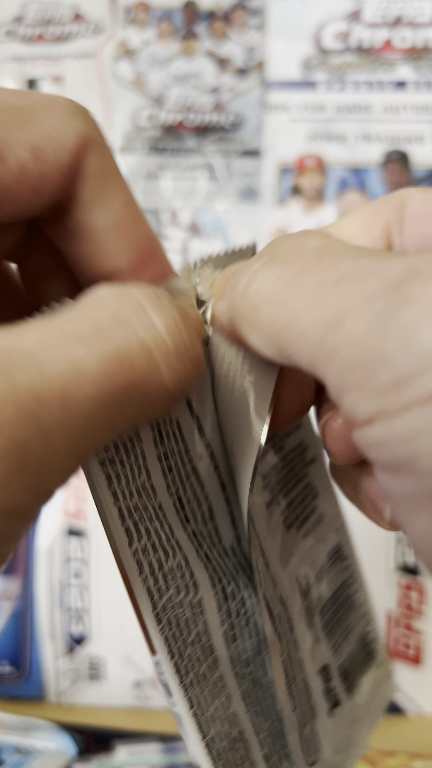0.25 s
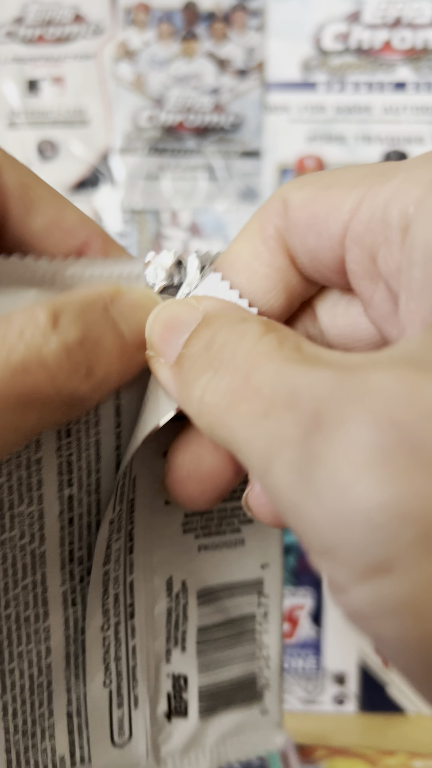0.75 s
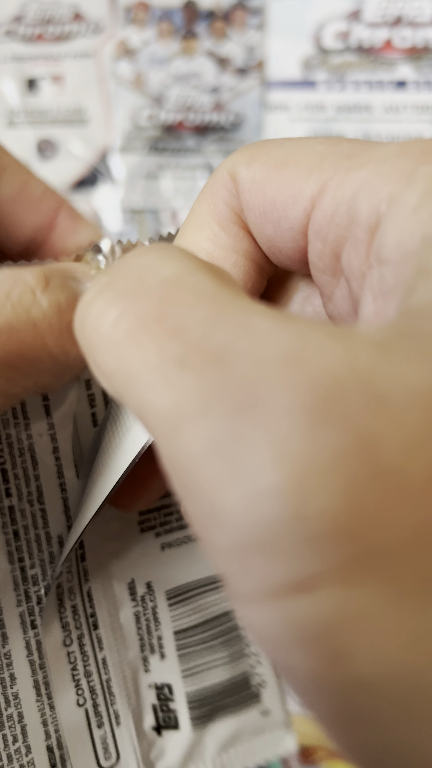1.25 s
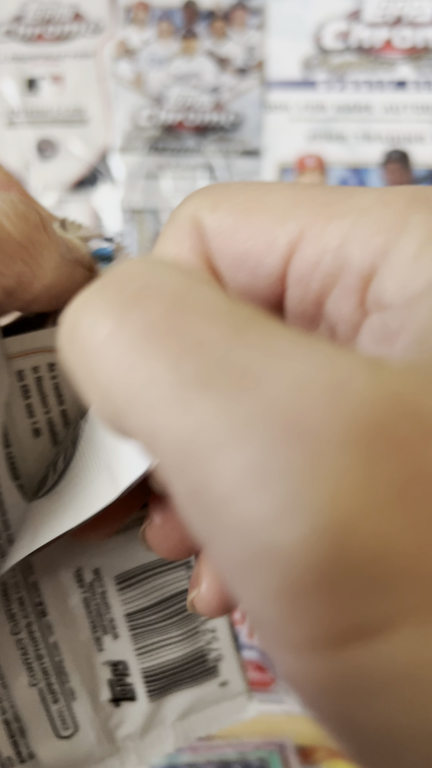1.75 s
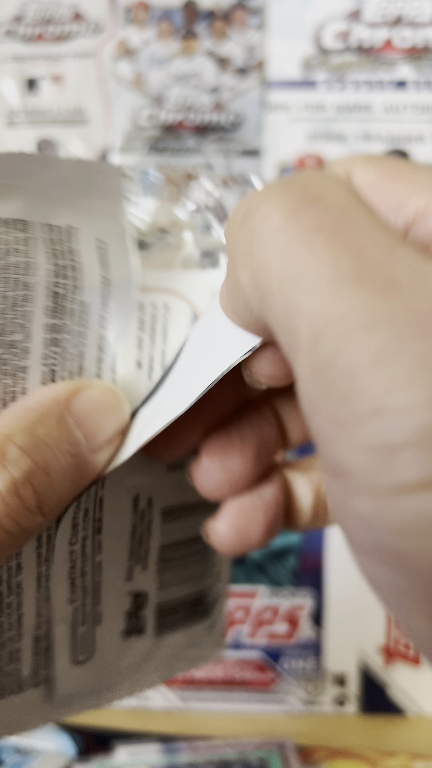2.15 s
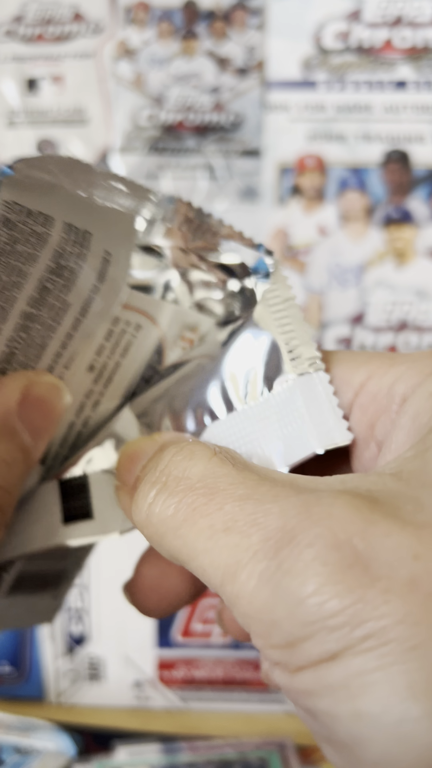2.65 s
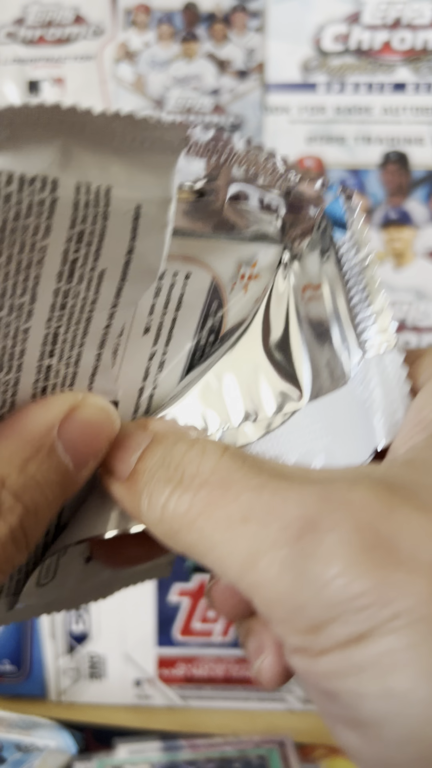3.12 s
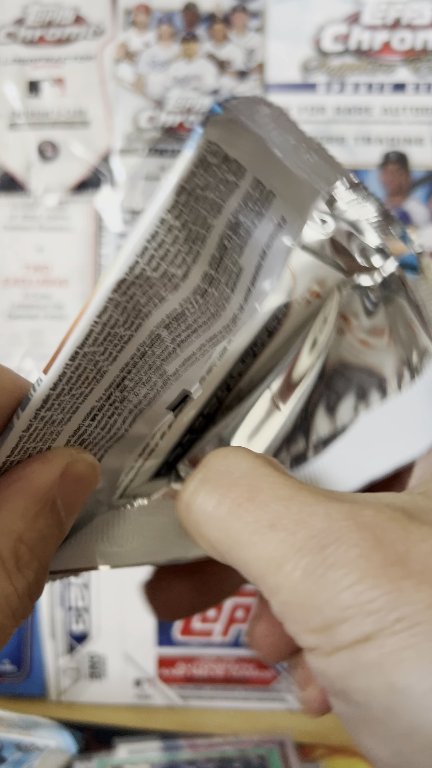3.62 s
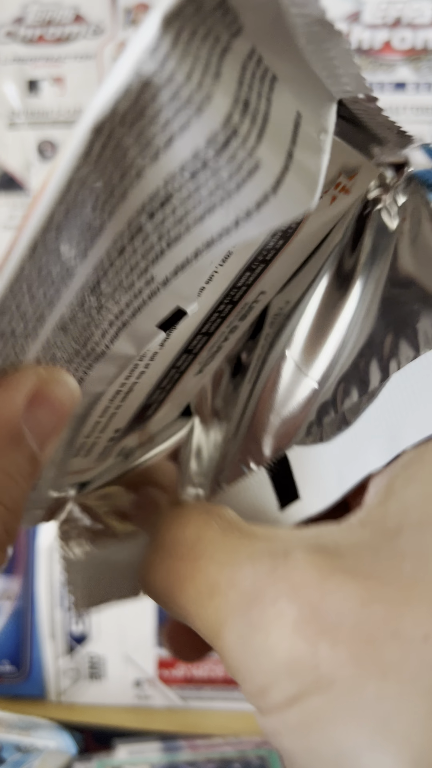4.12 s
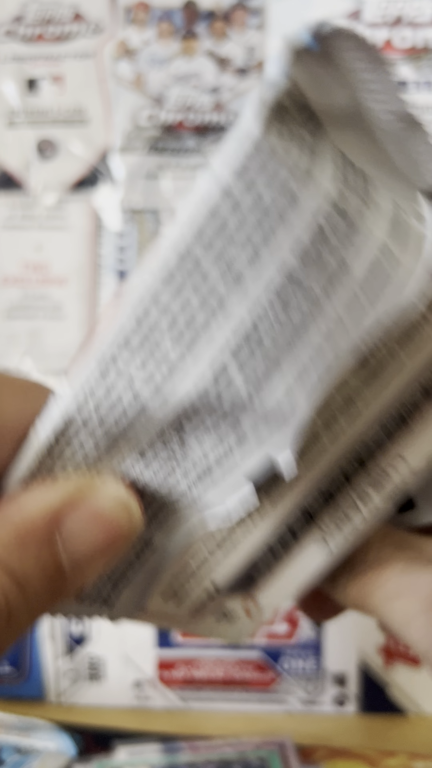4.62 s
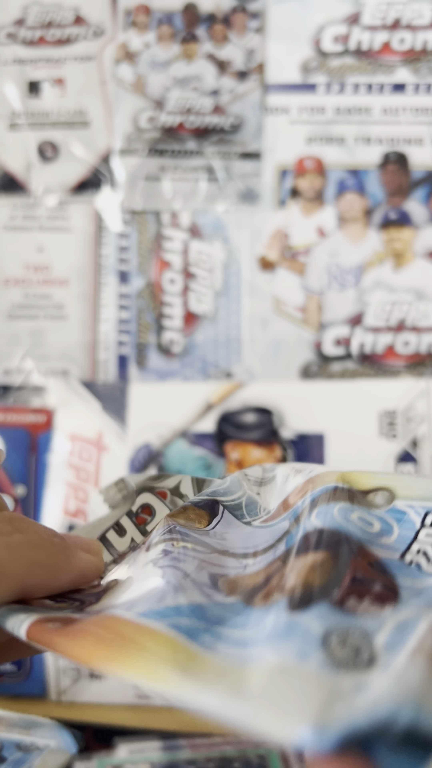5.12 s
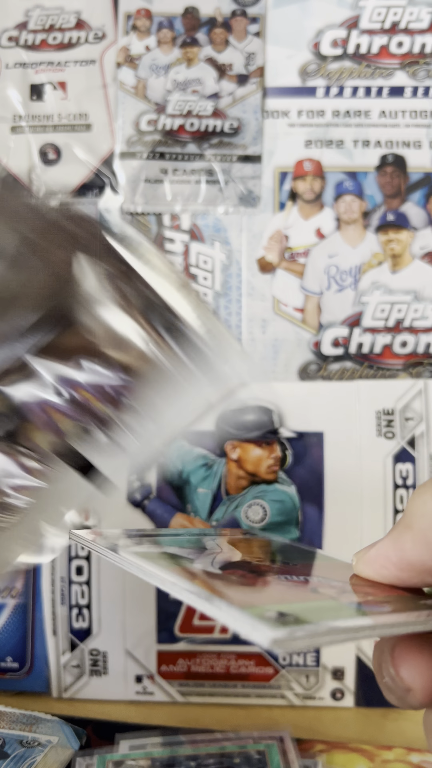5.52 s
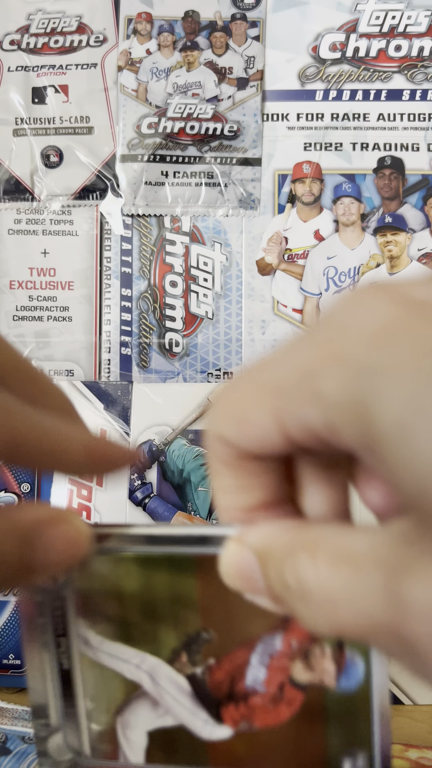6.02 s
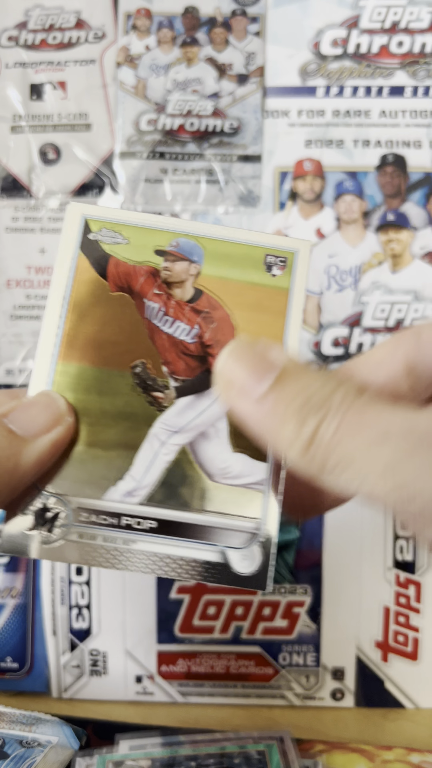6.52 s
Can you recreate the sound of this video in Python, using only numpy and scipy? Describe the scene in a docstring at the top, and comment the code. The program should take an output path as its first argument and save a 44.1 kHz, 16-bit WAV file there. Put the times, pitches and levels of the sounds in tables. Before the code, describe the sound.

Crisp wrapper crackles and bright film snaps grow fuller as a small pack opens, ending in faint card scuffs in a quiet room.

```python
"""Opening a pack of trading cards

Hands peel open a foil-plastic pack close to two microphone ports in a small room. Film creases are filtered
noise bursts, single or in crackling runs; sliding is shaped noise; bumps are sagging tones in dull noise.
The wider the pack opens, the fuller it sounds; then the bare cards slide and scuff quietly.
Short echoes, a small diffuse room, low ventilation noise and a faint fan whine surround it."""
import sys
import numpy as np
from scipy import signal
from scipy.fft import rfft, irfft, next_fast_len
from scipy.io import wavfile

SR = 44100
rng = np.random.default_rng(int(sys.argv[2]) if len(sys.argv) > 2 else 0)


def log_audio(samples):
    """Write samples as a 16-bit WAV file to the path given in sys.argv[1]."""
    # one column per channel
    frames = np.atleast_2d(samples).T
    # limit to full scale, then quantise
    limited = np.clip(frames, -1, 1)
    pcm = np.round(limited * 32767).astype(np.int16)
    wavfile.write(sys.argv[1], SR, pcm)


N = 298557
TIME = np.arange(N) / SR

CARDS_OUT_S = 5.0
# resonances: taut film, bare card, air in the opened pack
POUCH_HZ, CARD_HZ, HOLLOW_HZ = 1830, 2380, 622


def from_db(db):
    """Amplitude gain of a level in dB."""
    return 10 ** (np.asarray(db) / 20)


def rms_one(x):
    """Scale to rms 1."""
    return x / np.sqrt(np.mean(x ** 2) + 1e-20)


def unit_burst(x):
    """Scale to the energy of one millisecond at rms 1."""
    return x / np.sqrt(np.sum(x ** 2) * 1000 / SR + 1e-20)


def at_hz(points, hz):
    """Interpolate (hz, value) points over log frequency."""
    points_hz, values = np.transpose(points)
    return np.interp(np.log(hz + 1), np.log(points_hz), values)


def band(x, low_hz, high_hz, order=2):
    """Butterworth band-pass."""
    sos = signal.butter(order, [low_hz, min(high_hz, .45 * SR)], "band", fs=SR, output="sos")
    return signal.sosfilt(sos, x + 1e-18)


def resonance(x, hz, width_hz):
    """Two-pole resonator, gain 1 on top."""
    r = np.exp(-np.pi * width_hz / SR)
    zeros = np.array([1, 0, -1]) * (1 - r * r) / 2
    poles = [1, -2 * r * np.cos(2 * np.pi * hz / SR), r * r]
    return signal.lfilter(zeros, poles, x + 1e-18)


def drift(rate_hz):
    """Random curve, rms 1, with rate_hz straight segments a second."""
    position = TIME * rate_hz
    count = int(position[-1]) + 2
    return rms_one(np.interp(position, np.arange(count), rng.standard_normal(count)))


def coloured(spectrum):
    """Noise of a given spectrum, rms 1."""
    size = next_fast_len(N)
    gain = from_db(at_hz(spectrum, np.fft.rfftfreq(size, 1 / SR)))
    return rms_one(irfft(rfft(rng.standard_normal(size)) * gain, size)[:N])


def add(out, s, sound):
    """Mix a short sound in at time s."""
    start = max(round(s * SR), 0)
    out[..., start:start + sound.shape[-1]] += sound[..., :N - start]


def spread(mid, side, side_db):
    """Left and right from a shared and an opposed part."""
    return mid + from_db(side_db) * side * np.array([[1], [-1]])


# mouth of the pack: time_s, open_share (0-1)
PACK_OPENING = [(1.75, 0.19), (2.65, 1)]


def openness(s):
    """How far the pack is open at time s, 0-1."""
    return np.clip(np.interp(s, *np.transpose(PACK_OPENING)), 0, 1)


def stutter(snap, gap, sign, longest_s=.0016, second_db=-5):
    """A crease gives in two steps; the gap between them gives each snap its own hollow colour."""
    lag = round(longest_s * gap * SR)
    share = from_db(second_db) * sign
    second = np.pad(snap, ((0, 0), (lag, 0)))[:, :snap.shape[1]]
    return (snap + share * second) / np.sqrt(1 + share ** 2)


def heave(noise, opening, sheet_s=0.0032, hollow_db=-7.0):
    """The whole sheet heaves and pumps the air inside; lower and more hollow as the pack opens."""
    push = noise * np.exp(-np.arange(len(noise)) / SR / sheet_s)
    hollow = from_db(hollow_db) * opening * unit_burst(resonance(push, HOLLOW_HZ, 210))
    sheet = unit_burst(band(push, 720 - 400 * opening, 1250))
    return unit_burst(sheet + hollow)


# big creases snapping through: start_s, crack_db, film_db (film around it re crack)
BIG_SNAPS = [(0.0863, -11.5, -20), (0.1664, -8.5, -33), (0.2005, -11.5, -13), (0.2604, -15, -24),
             (0.2701, -9.5, -17), (0.2773, -14, -30), (0.3162, -13, -20), (0.3265, -6.5, -22),
             (0.3905, -18.5, -39), (0.4473, -32, -13.5), (0.477, -24, -5), (0.5436, -11, -6),
             (0.6052, -22, -15.5), (0.7031, -11, -10), (0.734, -15, -17), (0.753, -13.5, -10.5),
             (0.8954, -26.5, -21), (0.9222, -28.5, -22), (0.9447, -13, -22), (0.996, -14, -15.5),
             (1.0176, -12.5, -12.5), (1.0397, -11.5, -5), (1.065, -9, -5.5), (1.077, -15, -13),
             (1.0894, -12.5, -0.5), (1.1417, -16.5, -16), (1.1557, -21, -6), (1.2053, -23.5, 0),
             (1.2455, -31.5, 3), (1.2698, -11.5, -12.5), (1.3874, -21, -10.5), (1.4066, -17.5, -4.5),
             (1.4952, -16, -14), (1.5023, -16, -16), (1.5356, -9.5, -21), (1.5598, -13.5, -22),
             (1.5865, -7.5, -6.5), (1.6422, -8.5, -3), (1.6542, -10.5, -8.5), (1.7224, -27, -7.5),
             (1.7514, -28.5, 2), (1.8254, -22, -7.5), (1.869, -19.5, -18), (1.9652, -21.5, -2.5),
             (2.1283, -26, -8), (2.1646, -28, -13), (2.2085, -3, -12), (2.3033, -25.5, -3),
             (2.3825, -30, -11), (2.5259, -25.5, -7), (2.57, -17, -12), (2.6181, -15.5, -8),
             (2.697, -10, -8.5), (2.7112, -8, -2), (2.7372, -15, -13), (2.8092, -28.5, 5),
             (2.8499, -5.5, -19), (2.8974, -22, 2), (2.954, -11.5, -9), (2.9941, -20.5, -5),
             (3.1117, -36, 6), (3.2502, -19.5, -28), (3.2831, -20, -15), (3.3228, -32, -1),
             (3.3517, -8, -14.5), (3.3931, -6.5, -12.5), (3.4062, -13, -4), (3.4312, -11, -20),
             (3.4802, -12, -2), (3.4989, -17, -6), (3.5782, -8.5, -12), (3.5839, -11.5, -19.5),
             (3.6282, -19, -9), (3.634, -9, -31), (3.6753, -21, -15), (3.6956, -16.5, -9),
             (3.8243, -17, -13.5), (3.9139, -12, -23), (3.9396, -14, -2), (3.9713, -26, 5.5),
             (4.026, -10, -7), (4.034, -7.5, -19), (4.0577, -5.5, -6), (4.0687, -11, 0.5),
             (4.1216, -7, -4.5), (4.1344, -13, -0.5), (4.1945, -16, 0), (4.22, -9, -30),
             (4.2417, -10, -4.5), (4.275, -15.5, 2.5), (4.332, -7.5, -5), (4.4617, -8, -20),
             (4.481, -11, -4.5), (4.5812, -10, -12), (4.6375, -7.5, -28), (4.647, -17.5, -0.5),
             (4.6872, -17, -4), (4.9496, -24, -9.5), (4.9565, -11, -17.5), (4.9716, -30, -12),
             (5.126, -30, -12), (5.386, -6.5, -16.5), (5.393, -14, -6), (5.411, -22, -7), (5.445, -15, -14),
             (5.544, -15.5, -16), (5.5782, -12.5, -7.5), (5.6513, -27.5, -5), (5.7124, -24, -5.5)]
# nominal crack pitch, its shift per dB of film, random spread
CRACK_HZ, CRACK_OCTAVES_PER_DB, CRACK_SCATTER_OCTAVES = 7500, -.008, .2
# whole sheet re film around the crease: when sealed, and gained when open
SHEET_DB, SHEET_OPEN_DB = -18.5, 13


def snaps(rows, crack_s=0.00047, rise_s=0.00016, facet_s=0.0015, flutter_s=0.0039, flutter_db=-23,
          width_hz=2800, splinter_db=-12, splinter_s=0.00023, pouch_width_hz=340, side_db=-13,
          facet_side_db=-12):
    """A crease flips in about a millisecond and shakes the film; more film shaken, lower crack."""
    out, t = np.zeros((2, N)), np.arange(1536) / SR
    onset = 1 - np.exp(-t / rise_s)
    flutter = from_db(flutter_db) * np.exp(-t / flutter_s)   # bending waves run on through the film
    for s, crack_db, film_db in rows:
        noise = rng.standard_normal((6, len(t)))
        facet_size = rng.uniform(-0.76, 1)
        length = 2 ** rng.uniform(-1.1, 0.73)
        scatter = CRACK_SCATTER_OCTAVES * rng.uniform(-1, 1)
        gap, sign = rng.uniform(.15, 1), rng.choice([-1, 1])
        if crack_db < -50 or s > TIME[-1]:
            continue
        opening = openness(s)
        crack_hz = CRACK_HZ * 2 ** (CRACK_OCTAVES_PER_DB * film_db + scatter)

        kick = noise[:2] * (np.exp(-t / (crack_s * length)) + flutter) * onset
        top, side = (unit_burst(band(resonance(k, crack_hz, width_hz), 2200, 20000)) for k in kick)
        splinter = unit_burst(band(noise[2] * onset * np.exp(-t / splinter_s), 16000, 17000))
        top = spread(unit_burst(top + from_db(splinter_db) * splinter), side, side_db)

        # pouch and bare cards ring at one pitch; in the open pack each facet has more of its own
        flex, flex_side = noise[3:5] * (np.exp(-t / (facet_s * length)) + flutter) * onset
        ring_hz = POUCH_HZ if s < CARDS_OUT_S else CARD_HZ
        ring = unit_burst(resonance(flex, ring_hz, pouch_width_hz)) * (1 - 0.32 * opening)
        facet = unit_burst(resonance(flex, 2700 * 2 ** (facet_size / 2), 300)) * (0.35 + 0.37 * opening)
        middle = unit_burst(ring + facet + 0.5 * unit_burst(band(flex, 1400, 6100)))
        middle = spread(middle, unit_burst(band(flex_side, 2400, 4500)), facet_side_db)

        sheet = from_db(film_db + SHEET_DB + SHEET_OPEN_DB * opening) * heave(noise[5], opening)
        crease = stutter(top + from_db(film_db) * middle, gap, sign)
        add(out, s, from_db(crack_db) * (crease + sheet))
    return out


# fingers crumple the film: start_s, end_s, effort_db, film_db (film around each crease re crack)
FILM_CRUMPLES = [(0.097, 0.12, -45, -21), (0.164, 0.223, -50, -22), (0.271, 0.325, -32.5, -17.5),
                 (0.693, 0.772, -46, -7.5), (1.045, 1.095, -34.5, -6), (1.136, 1.245, -48, -1.5),
                 (1.51, 1.656, -36, -11.5), (1.817, 1.91, -50, -5), (2.692, 2.731, -37, -4),
                 (2.868, 2.957, -43, -5), (3.0, 3.06, -52, -1), (3.197, 3.275, -50.5, -9.5),
                 (3.385, 3.493, -33.5, -7.5), (3.615, 3.71, -43, -6.5), (3.901, 3.952, -37, -7.5),
                 (4.055, 4.195, -29, -3.5), (4.234, 4.287, -44, -3.5), (4.541, 4.619, -45, -4),
                 (4.645, 4.735, -40, -5.5), (4.765, 4.794, -48.5, -1.5), (5.445, 5.475, -40, -4)]
# snaps in a crumple: mean rate, crack re effort, spreads of crack and film
RUN_PER_S, RUN_DB, RUN_SCATTER_DB, RUN_FILM_SCATTER_DB = 95, 17.5, 3.5, 3.5
RUN_FADE_DB_PER_S = 700.5   # once the fingers stop


def runs(count=22):
    """In a crumple one crease sets off the next at uneven gaps; returns rows for snaps()."""
    rows = []
    for start_s, end_s, effort_db, film_db in FILM_CRUMPLES:
        gaps = rng.gamma(3, 1 / 3, count)
        strength, film = np.clip(rng.standard_normal((2, count)), -2, 1.5)
        times = start_s + (np.cumsum(gaps) - gaps[0] / 2) / RUN_PER_S
        fade_db = RUN_FADE_DB_PER_S * np.maximum(times - end_s, 0)
        crack_db = effort_db + RUN_DB + RUN_SCATTER_DB * strength - fade_db
        rows += zip(times, crack_db, film_db + RUN_FILM_SCATTER_DB * film)
    return rows


# stray ticks: mean rate, crack, film re crack, spread of both
STRAY_PER_S, STRAY_DB, STRAY_FILM_DB, STRAY_SCATTER_DB = 20, -35.5, -6, 4


def strays(count=150):
    """Small creases of the strained film let go at random until the cards are out; rows for snaps()."""
    times = np.cumsum(rng.exponential(1, count)) / STRAY_PER_S
    strength_db, film_db = STRAY_SCATTER_DB * np.clip(rng.standard_normal((2, count)), -2, 2)
    fade_db = RUN_FADE_DB_PER_S * np.maximum(times - CARDS_OUT_S, 0)
    return list(zip(times, STRAY_DB + strength_db - fade_db, STRAY_FILM_DB + film_db))


# whole wall of the pack flips over: start_s, level_db (re unit burst)
WALL_POPS = [(1.136, -28), (1.2182, -23), (2.2086, -20), (2.697, -15), (2.712, -7), (2.735, -21),
             (2.897, -22), (3.284, -16.5), (3.9318, -14), (4.0577, -13.5), (4.1755, -15), (4.275, -16),
             (4.481, -19)]


def pops():
    """A wall of the pack flips with a knock, more hollow as the pack opens."""
    out = np.zeros(N)
    for (s, db), noise in zip(WALL_POPS, rng.standard_normal((len(WALL_POPS), SR // 20))):
        add(out, s, from_db(db) * heave(noise, openness(s)))
    return out


def crackle(level_db, per_s=115, size_db=4.0, burst_s=0.00056, pitch_hz=7600, width_hz=2600,
            facet_db=-10, gain_db=-7.5, count=2000):
    """Small wrinkles give way at random, more often under strain; pitch and share of body vary."""
    out, t = np.zeros((2, N)), np.arange(256) / SR
    rate = np.minimum(per_s * from_db(.5 * (level_db + 40)), 2000)   # per_s holds at -40 dB
    noises = rng.standard_normal((count, 3, len(t)))
    traits = np.clip(rng.standard_normal((count, 4)), -2, 2)
    for at in np.flatnonzero(rng.random(N) < rate / SR):
        noise, (size, pitch, body, facet) = noises[at % count], traits[at % count]
        tick_hz = pitch_hz * 2 ** (.27 * pitch)
        kick = noise[:2] * np.exp(-t / burst_s)
        tick, side = (unit_burst(resonance(k, tick_hz, width_hz)) for k in kick)
        flex = noise[2] * np.exp(-t / burst_s / 2)
        flex = unit_burst(resonance(flex, POUCH_HZ * 2 ** (facet / 2), 500))
        wrinkle = spread(tick, side, side_db=-17) + from_db(facet_db + 4.2 * body) * flex
        gain = from_db(level_db[at] + gain_db + size_db * size)
        add(out, at / SR, wrinkle * gain / np.sqrt(rate[at] / 1000))   # denser ticks are each weaker
    return out


ATTACK_DB_PER_S, SWELL_DB, RELEASE_DB_PER_S = 519, 3.5, 293.5


def move(start_s, end_s):
    """Gain of one move of the hands: it sets in, swells while it lasts and lets go."""
    progress = np.clip((TIME - start_s) / max(end_s - start_s, .001), 0, 1)
    attack_db = ATTACK_DB_PER_S * np.maximum(start_s - TIME, 0)
    release_db = RELEASE_DB_PER_S * np.maximum(TIME - end_s, 0)
    return from_db(np.maximum(SWELL_DB * (progress - 1) - attack_db - release_db, -200))


# film or card slides under the fingers, before gains: start_s, end_s, hiss_db, drag_db (re hiss)
FINGER_SLIDES = [(0.0, 0.01, -36, -27), (0.55, 0.63, -46, -24), (0.747, 0.805, -40.5, -32),
                 (0.904, 0.99, -48, -28), (1.278, 1.32, -36, -28), (1.597, 1.662, -39, -8),
                 (1.67, 1.7, -50, -22), (1.875, 1.93, -41.5, -12), (1.988, 2.125, -40.5, -19),
                 (2.203, 2.245, -46, -4), (2.29, 2.56, -48, -9.5), (2.646, 2.73, -44, 3),
                 (2.987, 3.11, -46.5, -2.5), (3.467, 3.495, -29, -21), (3.64, 3.72, -40, -2),
                 (3.845, 3.9, -45, -22), (4.113, 4.182, -34.5, 1.5), (4.33, 4.37, -42.5, -2),
                 (4.487, 4.6, -41, -2), (4.735, 4.795, -35, -4.5), (5.028, 5.12, -48, -6),
                 (5.254, 5.31, -47, -2), (5.329, 5.39, -35.5, -8), (5.41, 5.48, -43, 5),
                 (5.582, 5.66, -53, 7.5), (5.716, 5.81, -53, -2), (5.856, 5.92, -45.5, -4.5),
                 (6.08, 6.11, -60.5, -8), (6.27, 6.32, -75, 0), (6.4, 6.518, -75, 0.5)]
# faint hiss of the held pack, before gains: time_s, level_db
HELD_HISS = [(0.0, -53), (1.24, -43), (2.53, -51.5), (4.2, -39.5), (5.13, -56), (5.71, -58), (6.05, -79.5),
             (6.77, -82)]
HOLD_DB, CRUMPLE_HISS_DB = -9, -3   # gains into the hiss
DRAG_DB, DRAG_OPEN_DB = -28, 24.5   # drag re hiss: when sealed, and gained when open
CRUMPLE_CRACKLE_DB, SLIDE_CRACKLE_DB = 4, -2.5   # fine crackle re each kind of move


def hands():
    """Control levels in dB of hiss, skin drag and fine crackle, powers summed over all moves."""
    hold = from_db(np.interp(TIME, *np.transpose(HELD_HISS)) + HOLD_DB)
    effort = sum(from_db(db) * move(start_s, end_s) for start_s, end_s, db, _ in FILM_CRUMPLES)
    hiss = hold ** 2 + (from_db(CRUMPLE_HISS_DB) * effort) ** 2
    drag = hiss * from_db(DRAG_DB + DRAG_OPEN_DB * openness(TIME)) ** 2
    strain = hold ** 2 + (from_db(CRUMPLE_CRACKLE_DB) * effort) ** 2
    for start_s, end_s, hiss_db, drag_db in FINGER_SLIDES:
        power = (from_db(hiss_db) * move(start_s, end_s)) ** 2
        hiss = hiss + power
        drag = drag + power * from_db(drag_db) ** 2
        strain = strain + power * from_db(SLIDE_CRACKLE_DB) ** 2
    return 10 * np.log10([hiss, drag, strain])


# sliding film spectrum: freq_hz, density_db_per_hz (relative)
FILM_SPECTRUM = [(1000, -18.5), (2400, -12), (4200, -5.5), (6200, -1.5), (8300, 1), (10500, -2),
                 (12300, -17.5), (15500, -10.5)]
# sliding bare card spectrum: freq_hz, density_db_per_hz (relative)
CARD_SPECTRUM = [(1000, -17), (1700, -17), (2400, -8), (3200, -13.5), (4700, -11), (6000, -4), (8500, 1),
                 (10500, 3), (12300, -17), (15500, -18)]
# skin drag spectrum: freq_hz, density_db_per_hz (relative)
SKIN_SPECTRUM = [(60, 2.5), (200, 5), (800, -6), (1800, -15), (3000, -8.5), (6000, -33.5)]


def friction(slide_db, rub_db, grain_db=3.0, slide_gain_db=-5.0, rub_gain_db=-1.0, card_db=-9,
             card_width_hz=380, waver_db=2.0):
    """Film, then bare card, slides with a grainy hiss; skin drags lower and unevenly."""
    ring = from_db(card_db) * rms_one(resonance(rng.standard_normal(N), CARD_HZ, card_width_hz))
    film = spread(coloured(FILM_SPECTRUM), coloured(FILM_SPECTRUM), side_db=-13.5)
    card = spread(coloured(CARD_SPECTRUM) + ring, coloured(CARD_SPECTRUM), side_db=-1.5)
    bare = np.clip((TIME - CARDS_OUT_S) * 10 + 1, 0, 1)   # 0.1 s crossfade
    surface = np.sqrt(1 - bare) * film + np.sqrt(bare) * card
    hiss_db = slide_db + slide_gain_db + grain_db * drift(700) + waver_db * drift(45)
    drag_db = rub_db + rub_gain_db + 3.4 * drift(60)
    drag = spread(coloured(SKIN_SPECTRUM), coloured(SKIN_SPECTRUM), side_db=-19) * from_db(drag_db)
    grip = np.clip((slide_db + 87.5) / 20, .1, 1)   # loosely held cards hardly drag
    return surface * from_db(hiss_db) + grip * drag


# fingers and stack bump the pack: peak_s, level_db (before gain), pitch_hz (at the peak)
PACK_BUMPS = [(0.125, -32, 62), (1.03, -48, 76.2), (1.655, -39, 126), (2.118, -34, 175), (2.717, -41, 170),
              (3.291, -30, 178.5), (3.413, -37, 143), (3.729, -37, 158.4), (4.143, -25.5, 178),
              (4.339, -30.5, 186.5), (4.494, -24, 112.7), (4.648, -30.5, 183), (4.81, -34.5, 139),
              (4.9, -30, 112.3), (5.141, -40, 112), (5.261, -37.5, 118), (5.424, -32.5, 81.4),
              (5.717, -32, 99), (5.805, -34, 109.3), (6.63, -59, 190)]


def bumps(swell_s=0.008, decay_s=0.012, sag_s=0.0698, gain_db=-6.0, thud_db=1.0):
    """A soft swing of the pack sags in pitch as the fingers yield, buried in a dull thud."""
    out, t = np.zeros(N), np.arange(-SR // 20, SR // 10) / SR
    press = np.exp(np.where(t < 0, -(t / swell_s) ** 2, -t / decay_s))
    for (s, db, hz), noise in zip(PACK_BUMPS, rng.standard_normal((len(PACK_BUMPS), len(t)))):
        sag = sag_s * 2 ** rng.uniform(-0.63, 1)
        pitch_hz = hz * np.exp(-np.maximum(t, -swell_s) / sag)
        swing = np.sqrt(2) * np.sin(2 * np.pi * np.cumsum(pitch_hz) / SR)
        thud = from_db(thud_db) * rms_one(band(noise, hz * .3, hz * 1.8))
        add(out, s + t[0], from_db(db + gain_db) * (swing + thud) * press)
    return out


# card edges catch on each other: start_s, level_db (before gain), pitch_hz
CARD_SCUFFS = [(0.098, -46, 460), (5.672, -50, 1617), (5.745, -50, 1920), (5.857, -50, 4470),
               (5.898, -47, 1252), (5.921, -47.5, 1260), (6.08, -68.5, 6060), (6.239, -68, 11660),
               (6.613, -79.5, 4360)]


def scuffs(stroke_s=.0035, relative_width=.28, gain_db=2.5):
    """A card edge drags for a few milliseconds and makes the card chirp."""
    out, t = np.zeros(N), np.arange(SR // 10) / SR
    stroke = t / stroke_s * np.exp(1 - t / stroke_s)
    for (s, db, hz), noise in zip(CARD_SCUFFS, rng.standard_normal((len(CARD_SCUFFS), len(t)))):
        width_hz = hz * relative_width
        chirp = resonance(resonance(noise, hz, width_hz), hz, width_hz * 2)
        add(out, s, from_db(db + gain_db) * stroke * rms_one(chirp))
    return out


# phase between the microphone ports: freq_hz, left_lead_rad
PORT_PHASE = [(3300, 0), (4300, .6), (5400, -.9), (6700, -1.3), (15000, -1.6)]


def ports(x):
    """Close sounds arrive out of phase in the treble: left leads near 4.3 kHz, right above 4.7 kHz."""
    size = next_fast_len(N)
    lead_rad = at_hz(PORT_PHASE, np.fft.rfftfreq(size, 1 / SR))
    turn = lead_rad * np.array([[.5], [-.5]])
    return irfft(rfft(x, size) * np.exp(1j * turn), size)[:, :N]


def nearby(x, echo_db=-17, count=5):
    """Hands, desk and boxes throw back a few early echoes, different at each port."""
    out, dull = np.zeros((2, N)), band(x, 700, 6500, order=1)
    for side in (0, 1):
        for delay_s in rng.uniform(.001, 0.01, count):
            add(out[side], delay_s, dull[side] * from_db(echo_db) / np.sqrt(count))
    return out


ROOM_T60_S, ROOM_DB = 0.11, -23


def room(x, build_s=0.0045, unlike_above_hz=2200):
    """Diffuse reflections die smoothly, alike at the ports in the bass, different in the treble."""
    t = np.arange(SR // 2) / SR
    mid, side = rng.standard_normal((2, len(t)))
    tail = spread(mid, band(side, unlike_above_hz, 19000, order=1), 0)
    tail = band(tail, 120, 14000, order=1)
    tail = tail * from_db(-60 * t / ROOM_T60_S) * (1 - np.exp(-t / build_s))
    tail /= np.sqrt(np.sum(tail ** 2, axis=1, keepdims=True))
    return from_db(ROOM_DB) * signal.fftconvolve(x, tail, axes=1)[:, :N]


# ventilation spectrum: freq_hz, density_db_per_hz (relative)
AIR_SPECTRUM = [(30, -2), (165, -1.5), (320, -4.5), (480, -17), (1100, -31), (1950, -26.5), (3000, -31),
                (8000, -38), (15000, -52)]
ROOM_AIR_DB, FAN_HZ, FAN_DB = -65.5, 900, -87


def background():
    """Low ventilation noise with a faint, phase-wavering fan whine."""
    air = spread(coloured(AIR_SPECTRUM), coloured(AIR_SPECTRUM), side_db=-12.5)
    whine = np.sqrt(2) * np.sin(2 * np.pi * FAN_HZ * TIME + .4 * drift(8))
    return from_db(ROOM_AIR_DB) * air + from_db(FAN_DB) * whine


def scene():
    """The pack close to the two microphone ports, with its echoes and the room's air."""
    slide_db, rub_db, crackle_db = hands()
    film = snaps(BIG_SNAPS + runs() + strays()) + pops() + crackle(crackle_db)
    pack = ports(film + friction(slide_db, rub_db) + bumps() + scuffs())
    return pack + nearby(pack) + room(pack) + background()


def record(dry, top=0.91, low_cut_hz=42, cutoff_hz=16000):
    """The microphone drops the deepest bass, rounds off the tallest snaps and cuts the top."""
    high_pass = signal.butter(3, low_cut_hz, "high", fs=SR, output="sos")
    low_pass = signal.cheby1(12, .2, cutoff_hz, fs=SR, output="sos")
    thin = signal.sosfilt(high_pass, dry)
    rounded = top * np.tanh(thin / top)
    return signal.sosfilt(low_pass, rounded)


dry = scene()
out = record(dry)
log_audio(out)
```